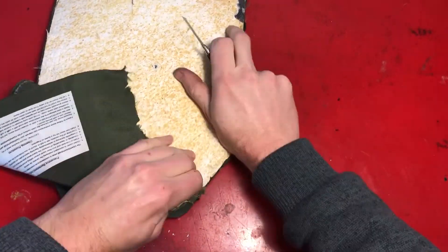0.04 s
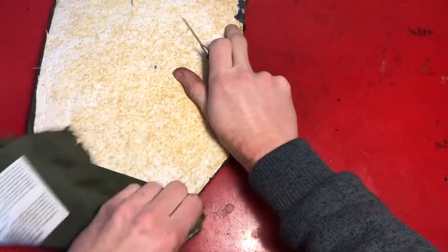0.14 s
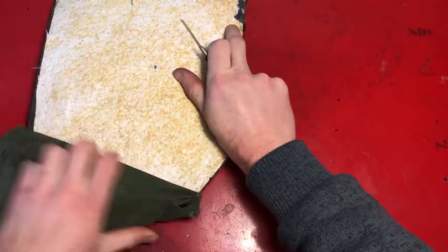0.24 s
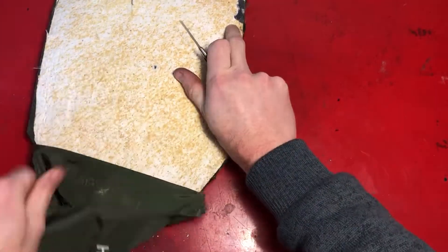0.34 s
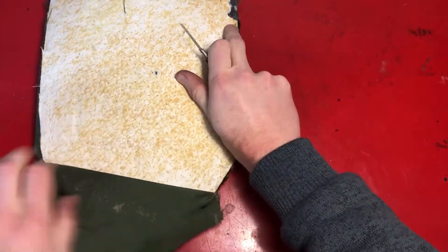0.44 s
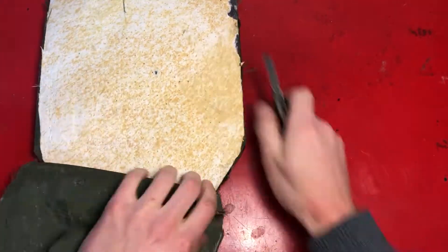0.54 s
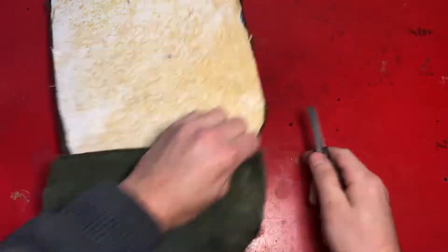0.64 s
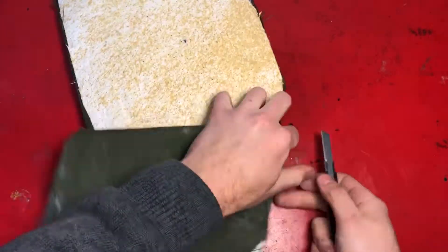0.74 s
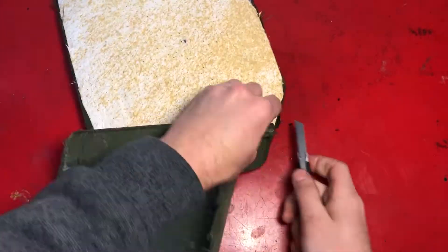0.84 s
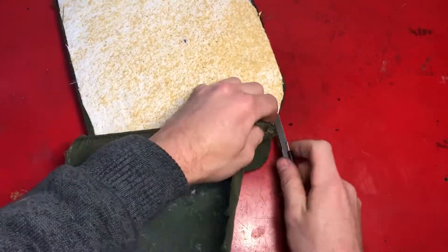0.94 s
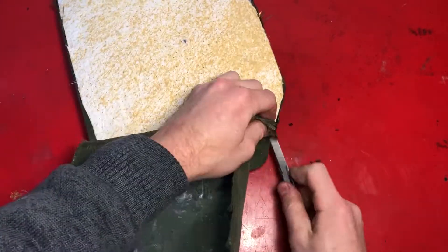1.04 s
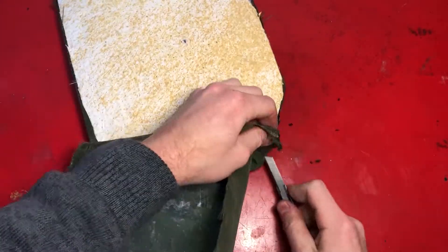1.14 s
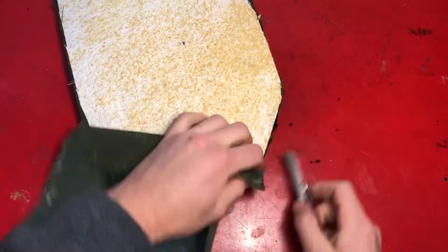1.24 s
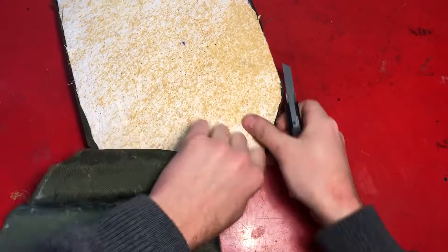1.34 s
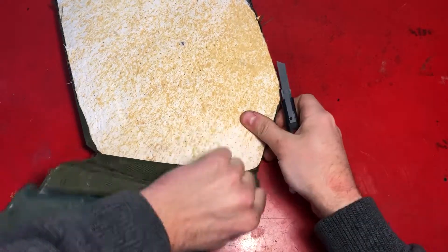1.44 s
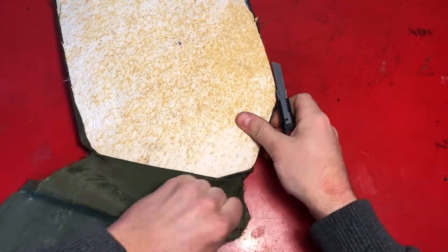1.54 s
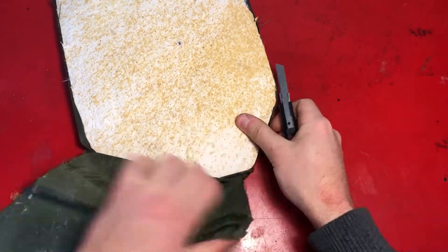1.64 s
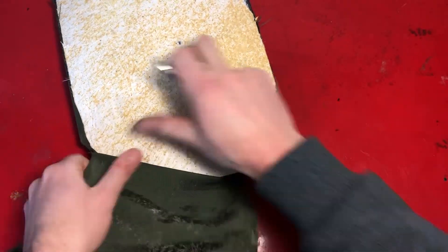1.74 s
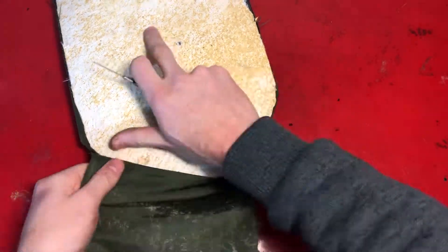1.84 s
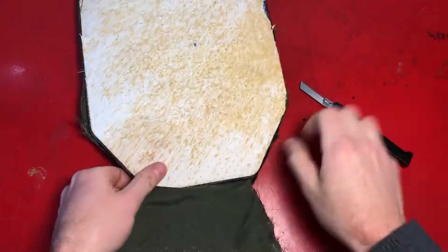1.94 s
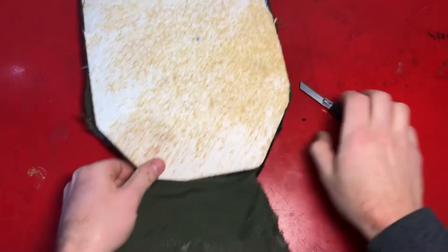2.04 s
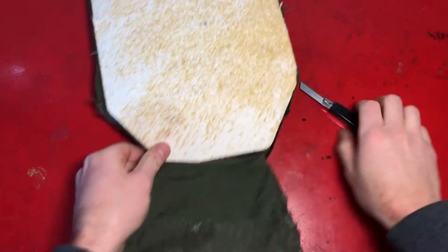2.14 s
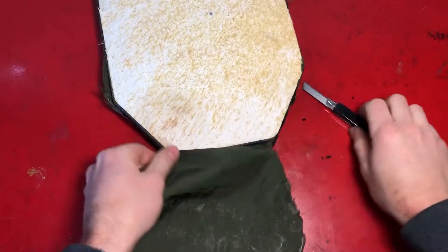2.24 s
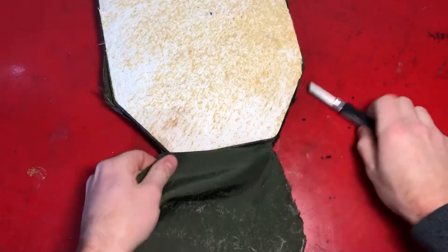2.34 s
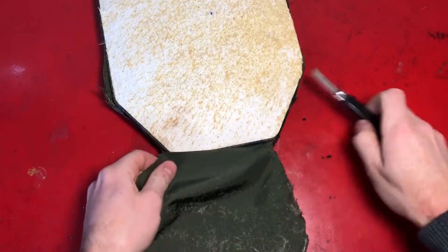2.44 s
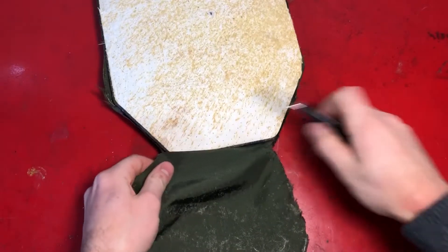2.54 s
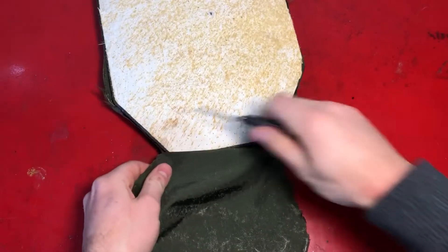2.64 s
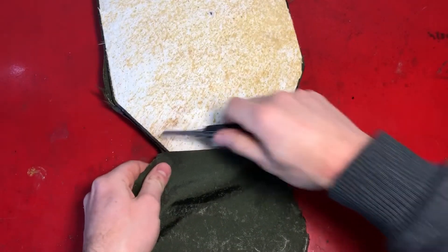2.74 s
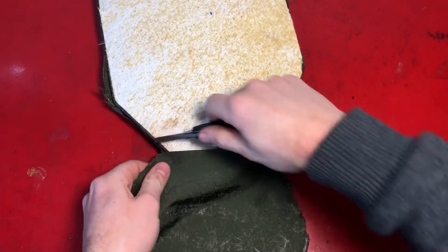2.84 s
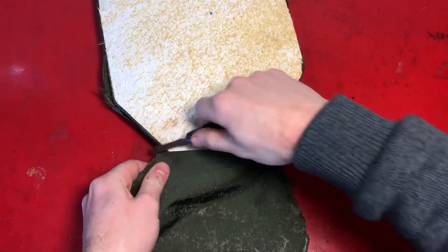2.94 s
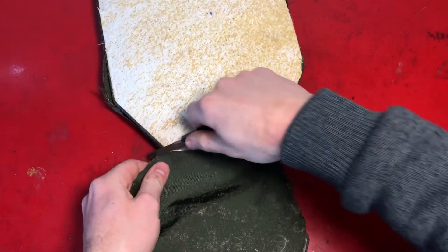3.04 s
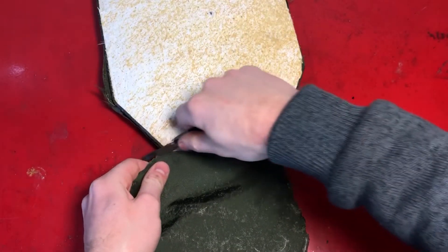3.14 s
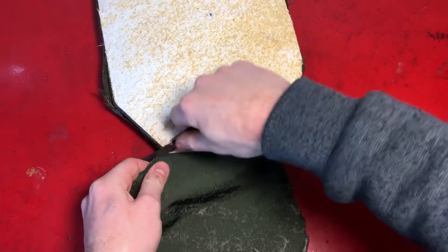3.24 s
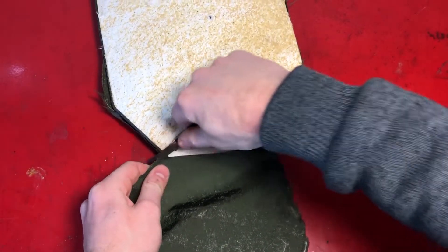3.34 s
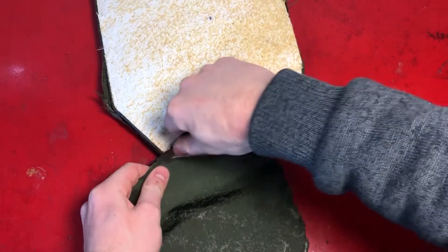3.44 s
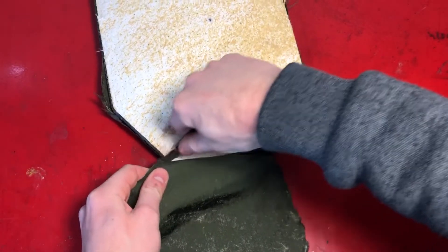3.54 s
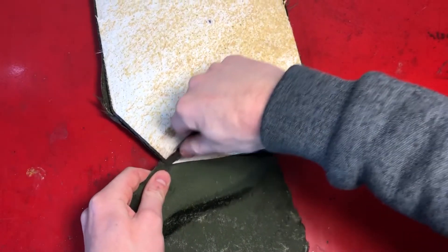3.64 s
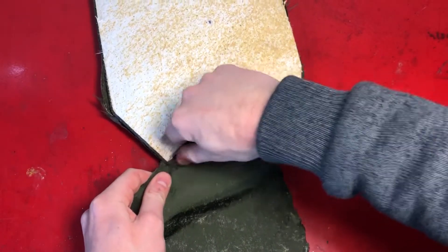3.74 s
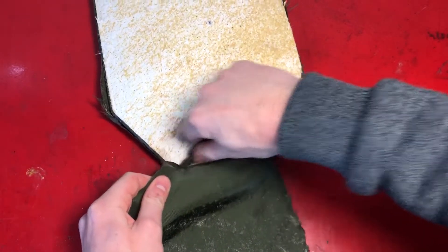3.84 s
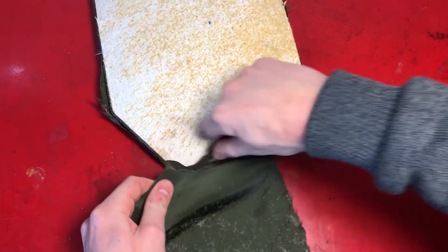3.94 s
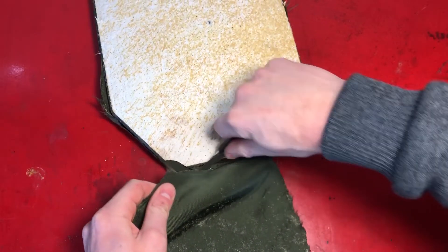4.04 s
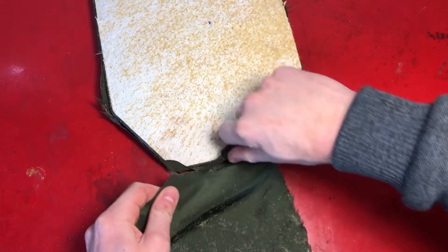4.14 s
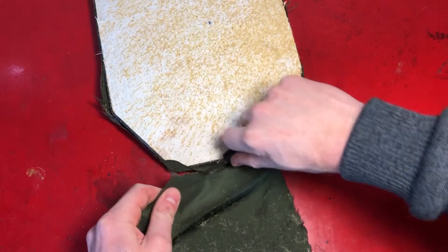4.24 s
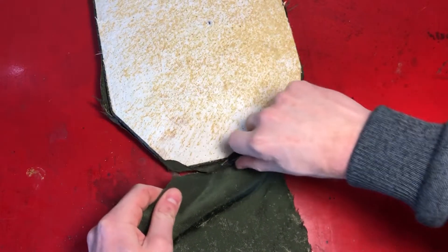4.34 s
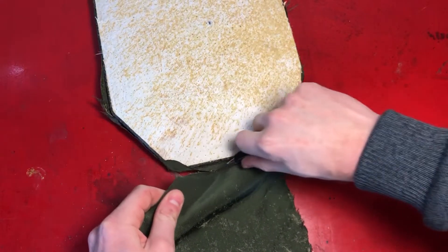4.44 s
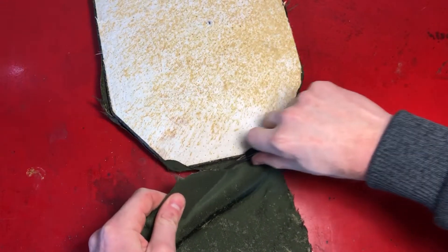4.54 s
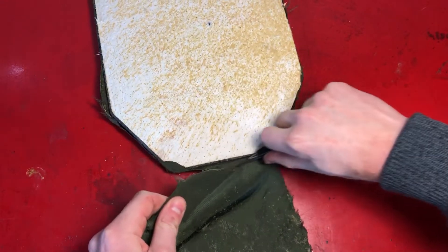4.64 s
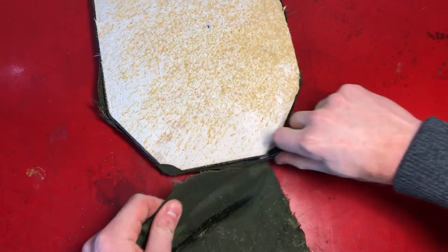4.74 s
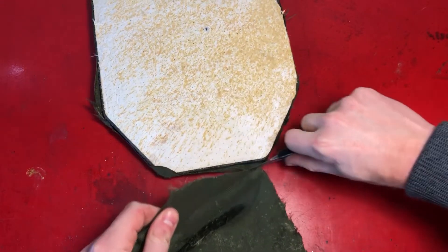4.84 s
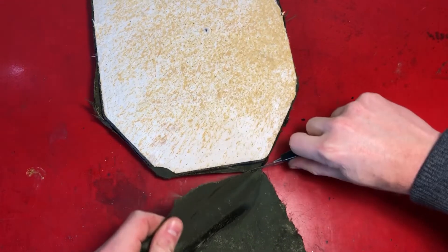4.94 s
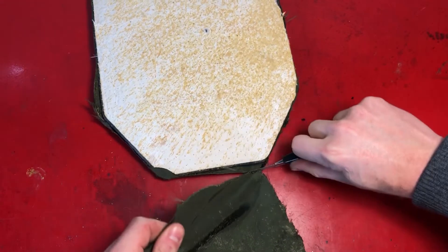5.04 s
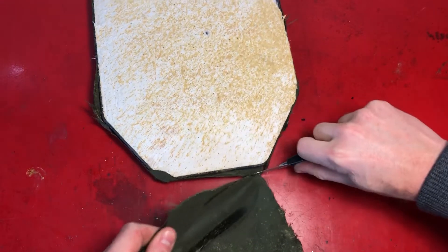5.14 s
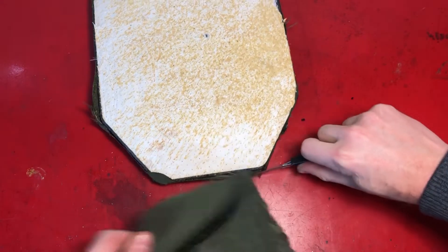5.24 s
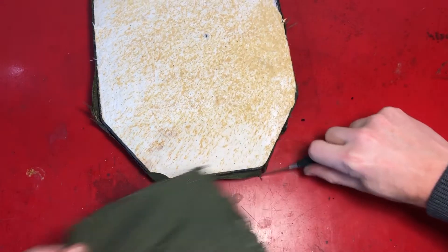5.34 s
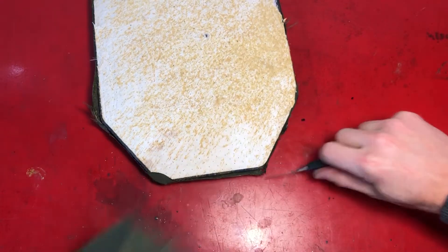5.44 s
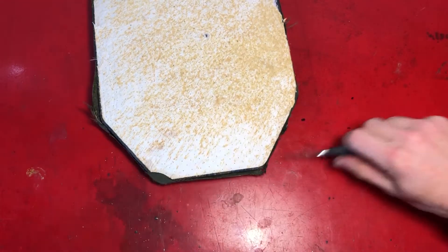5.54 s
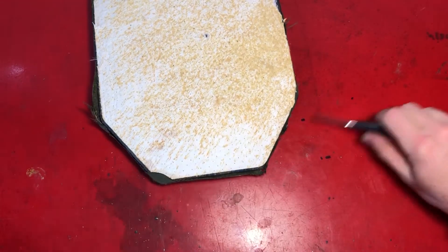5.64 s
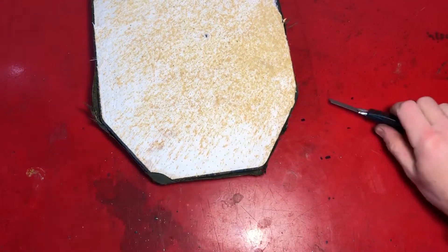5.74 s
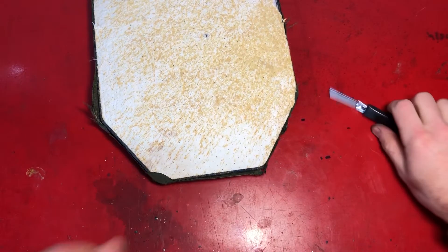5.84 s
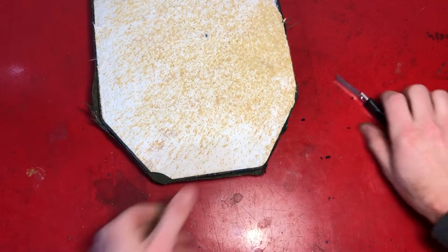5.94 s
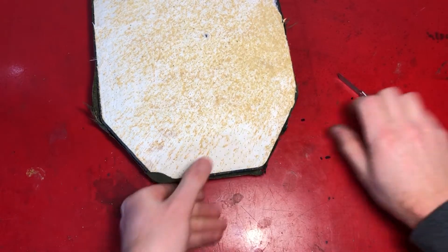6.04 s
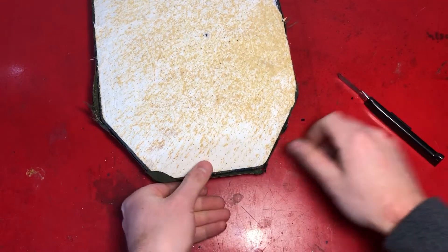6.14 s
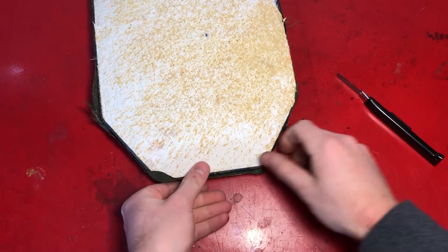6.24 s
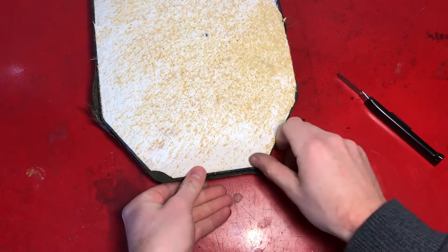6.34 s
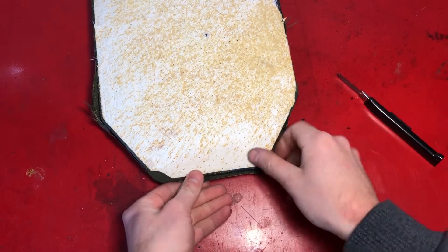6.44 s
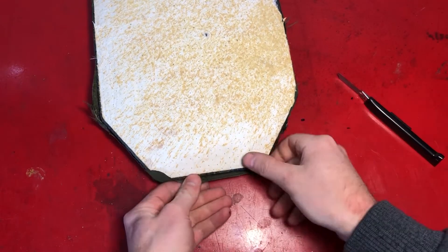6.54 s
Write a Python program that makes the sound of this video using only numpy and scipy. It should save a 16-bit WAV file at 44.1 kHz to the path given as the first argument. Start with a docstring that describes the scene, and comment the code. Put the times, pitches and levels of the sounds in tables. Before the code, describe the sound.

Close at a workbench, hands peel stiff glued cloth from a hard plate with light crackles, snaps and dull bumps. After a quieter stretch of faint rustling, a knife tears through in dense, bright, scratchy bursts, strongest past the middle. The ripping thins out, the knife is laid down with a hard clack, and faint handling follows. Small dry room, close microphone.

```python
"""At a workbench, hands peel a glued fabric cover off a hard plate and a knife cuts it free.
Glue and threads let go as dense crackle and click bursts that ring in cloth, loose flap and plate.
Noise through low resonances makes the bench boom under the pull; struck decaying modes and a rattle
lay the knife down with two taps and a clack. Coloured noise and a faint hum fill the room."""
import sys
import numpy as np
from scipy import signal
from scipy.fft import rfft, irfft
from scipy.io import wavfile
from scipy.ndimage import uniform_filter1d

SR = 44100
rng = np.random.default_rng(int(sys.argv[2]) if len(sys.argv) > 2 else 0)


def persist_wave(psi):
    """Save psi, clipped to +-1, as 16-bit WAV."""
    counts = np.round(np.clip(psi, -1, 1) * 32767).astype(np.int16)
    wavfile.write(sys.argv[1], SR, np.atleast_2d(counts).T)


N = 290619   # samples

AIR_DB, HUM_HZ, HUM_DB = -61, 120, -62
ROOM_T60_S, ROOM_DB, WALL_CUT_HZ = 0.1, -18.5, 3100
THREADS_PER_S, THREAD_UNEVEN_DB = 200, 4   # median rate, its spread
CLOTH_LOW_HZ, CLOTH_HIGH_HZ, CLOTH_DB = 2260, 6780, 2.5
FLAP_WIDTH_HZ, FLAP_DB = 850, -1
RIP_TAUT_DB, RIP_TREBLE_DB = -9.5, 0   # lifts shared by all rips
CUTOFF_HZ = 15850
CONTROL_STEP = 32   # samples per envelope point


def amp(db):
    """Gain of a level in dB."""
    return 10 ** (np.asarray(db) / 20)


def rms_one(x):
    """Scale to rms 1."""
    return x / np.sqrt(np.mean(x ** 2) + 1e-20)


def in_time(rows):
    """Interpolate each column of a (time, values...) table to every sample."""
    s, *columns = np.transpose(rows)
    return [np.interp(np.arange(N) / SR, s, c) for c in columns]


def drift(rate_hz):
    """Slow random wander of rms 1: white noise through a double real pole."""
    r = np.exp(-2 * np.pi * rate_hz / SR)
    noise = rng.standard_normal(N + 9000)
    return rms_one(signal.lfilter([1], [1, -2 * r, r * r], noise)[9000:])   # skip the start-up


def swell(s, db, rise_ms, hold_ms, fall_ms):
    """Envelopes, one per row: 9 dB up per rise time, a hold, 9 dB down per fall time."""
    ms = np.arange(0, N + CONTROL_STEP, CONTROL_STEP) * (1000 / SR) - 1000 * s[:, None]
    early = np.minimum(ms, 0) / np.maximum(rise_ms, 1)[:, None]
    late = np.maximum(ms - hold_ms[:, None], 0) / np.maximum(fall_ms, 1)[:, None]
    return amp(np.maximum(db[:, None] + 9 * (early - late), -200))


def fine(x):
    """Interpolate a control from envelope points to every sample."""
    return np.interp(np.arange(N) / CONTROL_STEP, np.arange(len(x)), x)


def resonate(x, peaks):
    """Parallel two-pole resonances, signs alternating; white noise of rms 1 comes out at rms 1."""
    def bank(v):
        out = 0
        for k, (hz, width_hz, db) in enumerate(peaks):
            r = np.exp(-np.pi * width_hz / SR)
            poles = [1, -2 * r * np.cos(2 * np.pi * hz / SR), r * r]
            out = out + (-1) ** k * amp(db) * signal.lfilter([1 - r * r, 0, r * r - 1], poles, v)
        return out
    impulse_response = bank(np.eye(1, SR // 4)[0])
    return bank(x + 1e-18) / np.sqrt(np.sum(impulse_response ** 2))


def air():
    """Steady room noise, shaped in the spectrum, and a mains hum of wavering level."""
    # room noise spectrum: f/Hz, density/dB (relative)
    air_colour = [(15, -44), (25, -9.5), (92, -6.5), (127, -6), (206, -11), (394, -14.5), (531, -22),
                  (796, -24.5), (887, -22.5), (2050, -20.5), (2700, -28.5), (6000, -34.5), (16000, -40)]
    colour_hz, colour_db = np.array(air_colour).T
    hz = np.fft.rfftfreq(N, 1 / SR) + 1   # +1 avoids log 0
    colour = np.interp(np.log(hz), np.log(colour_hz), colour_db)
    noise = irfft(rfft(rng.standard_normal(N)) * amp(colour), N)
    hum = amp(HUM_DB + 1.5 * drift(1.9)) * np.sin(2 * np.pi * HUM_HZ * np.arange(N) / SR)
    return amp(AIR_DB) * rms_one(noise) + hum


def bench():
    """Uneven pull and single jolts shake the low resonances of the bench top."""
    # bench shaken by the pull: t/s, boom level/dB, knock lift/dB
    shake = [(0.0, -35, -6), (0.24, -62, -2), (0.71, -60, -9), (0.92, -52, -7), (1.23, -62, 0),
             (1.91, -61, -3), (2.33, -53.5, -3.5), (2.62, -68, -3), (3.04, -68, 0), (3.89, -45, -6),
             (4.5, -55.5, -3), (4.77, -39.5, 0.5), (5.05, -45, -8), (5.32, -40, 2.5), (5.6, -59, -5),
             (5.89, -75, 9), (6.08, -60, -10), (6.59, -55.5, -0.5)]
    # rumble of handling under the boom, two stretches: t/s, level/dB
    rumble_curve = [
        [(0.0, -48), (0.258, -55.5), (1.164, -59.5), (1.698, -54.5), (1.9, -70)],
        [(1.92, -68), (3.19, -77.5), (3.35, -66), (6.25, -63), (6.59, -64)],
    ]
    # added jolts: t/s, boom level/dB, rise/ms per 9 dB, fall/ms per 9 dB, knock lift/dB, rumble lift/dB
    jolt_rows = [(.16, -38, 44, 29, -0.5, -12), (.415, -45.5, 19, 36, 3.5, -5),
                 (.55, -38, 12, 41, -12, -13), (.7, -38, 39, 27, -4, -8), (.79, -44, 12, 13, -1, -6),
                 (1.08, -49, 11, 40, -14, -21), (1.17, -42, 21, 45, -10, -18.5),
                 (1.27, -40, 44, 21, -11, -11), (1.382, -52.5, 17, 100, 2, -12),
                 (1.52, -37.5, 18, 15, -3, -17), (1.84, -33, 14, 25, -9, -6),
                 (2.2, -34, 22, 32, -21.5, -12), (2.39, -42.5, 20, 67, -25, -33),
                 (3.58, -58, 180, 88, -8, -13), (3.76, -56, 31, 43, -0.5, -12.5),
                 (4.001, -50.5, 86, 79, 2.5, -18), (4.419, -51.5, 11, 39, 6, -17.5),
                 (4.78, -44.5, 77, 56, -0.5, -28), (4.6, -44.5, 40, 94, -1, -32),
                 (4.93, -40, 50, 26, -8, -29.5), (5.289, -30, 14, 13, -11, -21.5),
                 (5.43, -40.5, 60, 23, -21, -14), (6.041, -32, 54, 41, -7.5, -19),
                 (6.29, -45, 120, 31, -6, -25)]
    # bench boom resonances: f/Hz, width/Hz, level/dB
    boom_modes = [(125.8, 27, -6.5), (141.6, 27.8, -0.5), (175.4, 15.7, 1), (213.6, 34, -5)]
    # bench knock resonances: f/Hz, width/Hz, level/dB
    knock_modes = [(278, 100, -1), (392.5, 49, 4), (466, 305, -6)]

    boom_db, lift_db = in_time(shake)
    (rumble_db,) = in_time(np.vstack(rumble_curve))
    s, db, rise_ms, fall_ms, knock_lift_db, rumble_lift_db = np.transpose(jolt_rows)
    jolts = swell(s, db, rise_ms, 0 * s, fall_ms)

    boom_gain = amp(boom_db) + fine(jolts.sum(axis=0))
    knock_gain = amp(boom_db + lift_db) + fine(amp(knock_lift_db) @ jolts)
    rumble_gain = amp(rumble_db) + fine(amp(rumble_lift_db) @ jolts)

    boom = rms_one(resonate(resonate(rng.standard_normal(N), boom_modes), boom_modes))
    knock = rms_one(resonate(rng.standard_normal(N) * amp(1.4 * drift(30)), knock_modes))
    rumble_band = signal.butter(2, [55, 115], "band", fs=SR, output="sos")
    rumble = rms_one(signal.sosfilt(rumble_band, rng.standard_normal(N)))
    return boom_gain * boom + knock_gain * knock + rumble_gain * rumble


def knife():
    """Each tap strikes the decaying modes of handle and bench and spits a short noise rattle."""
    # knife laid down: t/s, level/dB, handle lift/dB, bench lift/dB, rattle lift/dB
    tap_rows = [(5.837, -38.5, 0, -28, -1), (5.846, -48.5, 3, -22, -27), (5.853, -59, -6, -24, -22),
                (5.869, -28.5, -7, -41, -7.5), (5.883, -48, 11, -18, -28), (5.893, -61, -3, -24, -23),
                (5.905, -61, -3, -22, -27), (5.926, -8, -18, -17.5, -11), (5.986, -27.5, -13, -7.5, -36)]
    # ringing modes of the handle: f/Hz, level/dB, t60/s
    handle_modes = [(474, -11, 0.45), (1570, -9, 0.037), (1648, -5, 0.067), (2970, -6, 0.069),
                    (3350, -3, 0.11), (3500, -9, 0.045), (4005, -1.5, 0.046), (4240, -4, 0.05),
                    (5960, -12, 0.075), (6500, -8, 0.034), (8170, 2, 0.02)]
    # ringing modes of the bench: f/Hz, level/dB, t60/s
    bench_modes = [(151.7, -14, 0.93), (186.6, -7, 0.83), (391, -3.5, 0.2), (448, -4, .12),
                   (704, -8, 0.086), (570, -6.5, 0.089), (877, -4.5, 0.14), (970, 0, 0.1),
                   (1120, -2, 0.059), (1360, -14, 0.12), (1536, -5, 0.063), (2440, -20, 0.099)]

    s, tap_db, handle_db, bench_db, rattle_db = np.transpose(tap_rows)
    at = np.round(s * SR).astype(int)
    out = np.zeros(N)
    for modes, lift_db in ((handle_modes, handle_db), (bench_modes, bench_db)):
        for hz, db, t60_s in modes:
            strike_db = tap_db + lift_db + db + rng.normal(0, 3.8, len(at))
            clicks = np.full(N, 1e-18)
            clicks[at] = amp(strike_db) * rng.choice([-1, 1])
            r, w = amp(-60 / (t60_s * SR)), 2 * np.pi * hz / SR
            out += signal.lfilter([0, np.sin(w)], [1, -2 * r * np.cos(w), r * r], clicks)

    blows = np.zeros(N)
    blows[at] = amp(tap_db + rattle_db)
    rattle_t60_s = 0.13
    rattle = signal.lfilter([1], [1, -amp(-60 / (rattle_t60_s * SR))], blows) * rng.standard_normal(N)
    out += resonate(rattle, [(1180, 1400, 1.5), (4500, 6900, 0.69), (11000, 9300, -1.8)])
    # the taps carry no deep bass below about 130 Hz
    return signal.sosfilt(signal.butter(2, 130, "high", fs=SR, output="sos"), out)


def crackle(per_s, grain_db):
    """Fibres part at random in clumps, threads of the weave pop in near-regular turn; rms about 1."""
    sizes = amp(grain_db * np.minimum(rng.exponential(1, N), 5)) * rng.choice([-1, 1], N)
    grains = sizes * (rng.random(N) < per_s / SR) * amp(1.6 * drift(60))
    grains = grains / np.sqrt(uniform_filter1d(grains ** 2, SR // 20) + 1e-9)

    threads_per_sample = THREADS_PER_S / SR * amp(THREAD_UNEVEN_DB * drift(150))
    threads = np.diff(np.floor(np.cumsum(threads_per_sample)), prepend=0)
    pop_sizes = rng.uniform(0.16, 1.5, N) * rng.choice([-1, 1], N)
    pops = threads * pop_sizes * amp(5.1 * grain_db + 0.5)
    return (grains + pops) / np.sqrt(1 + uniform_filter1d(pops ** 2, SR // 10))


def strokes():
    """Crackle of the strokes, coarser the harder the pull, and their power-weighted mean colours."""
    # strokes of peeling, cutting and sliding: t/s, crackle level/dB, rise/ms per 9 dB, hold/ms,
    # fall/ms per 9 dB, plate lift/dB, taut-cloth lift/dB, treble lift/dB, low plate lift/dB, flap f/Hz
    stroke_rows = [(0.0, -51.5, 5, 15, 30, 5, 1, -4, -2, 3770),
                   (0.14, -38.5, 46, 10, 50, -22, -5, -2, -5.5, 3400),
                   (0.22, -48, 35, 250, 50, -1, -2, -5, -6, 3460),
                   (0.57, -48, 19, 330, 20, -3, -1.5, -6, -2, 3900),
                   (0.94, -58.5, 20, 100, 20, -4, 1, -11, -10, 4900),
                   (1.06, -38.5, 7.4, 60, 30, -16, -18, -9, 1, 4400),
                   (1.15, -37, 44, 70, 40, -12.5, -6, -5, -7, 5240),
                   (1.345, -49.5, 77, 10, 90, -2.5, -6, -4, -5.5, 4000),
                   (1.5, -41.5, 84, 5, 20, -2, -5, -2.5, -7, 3940),
                   (1.57, -51, 37, 100, 30, -2, -3, -6.5, -6, 4040),
                   (1.75, -47.5, 46, 20, 60, -11, -10, -8.5, -2, 4260),
                   (1.82, -53, 58, 80, 5, 1, 2, -3, -8, 3570),
                   (2.16, -48, 79, 140, 80, 0, -4.5, -5, -9.5, 3860),
                   (2.45, -48.5, 34, 30, 70, 3, -5, -6.5, -11, 4100),
                   (2.54, -56, 24, 120, 30, 1, -6, -8, -11, 4000),
                   (2.727, -57.5, 62, 10, 120, 2, -6, -10, -6.5, 3950),
                   (3.047, -49, 7.1, 190, 60, 0.5, -9, -13, -16, 3040),
                   (3.36, -41, 61, 5, 10, -1, -18, -8, -7, 4840),
                   (3.405, -47, 6.3, 55, 40, 3, 1, -4.5, -12.5, 3330),
                   (3.6, -34, 25, 5, 27, -2, -2, -5.5, -19, 4460),
                   (3.7, -44, 17, 75, 25, -1, -10, -5, -17, 4640),
                   (3.832, -21.5, 3.5, 6.9, 55, -0.5, -7.5, -5, -12, 5030),
                   (3.89, -25.5, 34, 180, 18, -8.5, -1.5, -9, -8, 4170),
                   (4.1, -41.5, 3.33, 5, 90, -2.5, -12, -7, -15.5, 4240),
                   (4.24, -57, 60, 135, 20, 9, -1.5, -11, -28.5, 4400),
                   (4.4, -18, 2.8, 3, 10, -5.5, -28, -10.5, -20, 3900),
                   (4.45, -36.5, 19, 40, 30, 0, -1.5, -15, -13.5, 3700),
                   (4.55, -22, 63, 200, 60, -6.5, -10.5, -6, -18, 3940),
                   (4.76, -27, 10, 85, 40, -12, -8, -6, -2.5, 3900),
                   (4.88, -34, 11, 50, 22, -13, -9, -7.5, -18.5, 4030),
                   (5.13, -43.5, 74, 60, 40, -10, -5, -9, 0, 4600),
                   (5.26, -34, 92, 25, 12, -1, -4, -3.5, -30.5, 4070),
                   (5.31, -53, 10, 170, 8, -16, -5, -12, -7, 4800),
                   (5.556, -66, 8, 5, 25, -9, -7, -6, -5, 3980),
                   (5.61, -56.5, 6, 51, 13, -2.5, -1, -7.5, -3, 3280),
                   (5.99, -48.5, 33, 5, 60, 10, 5, -10, -4, 3960),
                   (6.05, -56, 19, 10, 32, -16, -10, 9, -3, 4000),
                   (6.07, -56, 30, 160, 45, -2, -4, -8, -4, 3440),
                   (6.235, -54.5, 25, 5, 22, 0, -1, -7, 4, 3600),
                   (6.336, -60, 33, 5, 60, -13, -10, -6, -5, 3740),
                   (6.482, -53, 31, 5, 18, -6, -5, -2.5, -8, 4400),
                   (6.55, -60, 40, 50, 20, -1.5, -5, -1.5, 5, 4150)]
    s, db, rise_ms, hold_ms, fall_ms, *colours = np.transpose(stroke_rows)
    power = swell(s, db, rise_ms, hold_ms, fall_ms) ** 2
    total = power.sum(axis=0)
    crackle_db = fine(10 * np.log10(total))
    grain_db = np.clip(4.5 + 0.059 * (crackle_db + 21.5), 0, 6)
    force = amp(crackle_db) * crackle(9000, grain_db)
    return force, [fine(c @ power / total) for c in colours]


def rips():
    """Uneven sprays of clicks swell to a peak and die away; short ones are single snaps."""
    # glue and threads ripping: t/s, crackle level/dB, plate lift/dB, rise/ms per 9 dB, fall/ms per 9 dB
    rip_rows = [(0.048, -43, 0.5, 2, 36), (.0913, -33, -5, 2.5, 3.4), (0.119, -24.5, 0, 1.7, 7.7),
                (0.1618, -22, 5, 7.4, 5.9), (.1909, -40.5, 10.5, 3.5, 3.1), (0.2323, -47.5, 11, 6, 6),
                (0.2647, -41, 6, 9.8, 10), (.3046, -39, 10, 0.23, 2.2), (.381, -35.5, 1.5, 5.4, 30),
                (0.484, -38.5, -6.5, 1.2, 15), (0.5525, -34, -4.5, 5.4, 9.8), (.583, -39, -3.5, 5.6, 13),
                (.625, -37, 0.5, 6.7, 21), (.715, -37.5, -10, 3.9, 9), (.7855, -36, 1.5, 2.7, 7.9),
                (0.8069, -45, -9, 2.4, 11), (0.8809, -40.5, -7, 10, 23), (1.0077, -48, 5, 5.2, 2.1),
                (1.051, -24.5, -10.5, 0.34, 1.9), (1.0715, -23.5, -16.5, 5.3, 8.5),
                (1.1193, -36, -22, .37, 6.6), (1.1366, -21.5, -8.5, .37, 3.7), (1.1565, -30, -10, 23, 1.8),
                (1.1689, -22.5, -12.5, 4.4, 2.6), (1.2003, -28, -8.5, 2.1, 5), (1.2548, -26, -13, 1.6, 4.1),
                (1.3026, -35.5, -10, 9.4, 17), (1.3547, -36, 0, 0.22, 15), (1.393, -42, 3, 8.1, 32),
                (1.4444, -28.5, -0.5, 0.39, 1.4), (1.4812, -27.5, -15, .3, 2.3),
                (1.506, -14.5, -4, 1.4, 4.7), (1.521, -28, -17.5, 14, 2.5), (1.621, -34.5, -37, 0.33, 3),
                (1.6523, -37.5, 5, 0.19, 2.7), (1.6797, -37, -6, 1, 17), (1.73, -43, -10, 6.8, 11),
                (1.7769, -39, 3.5, 9.2, 9.5), (1.836, -41, 3, 3.4, 4.7), (1.9045, -45, 1, 9.5, 2.1),
                (2.86, -58.5, -3.5, .2, 2.1), (3.235, -16.5, -6.5, 0.19, 3.5), (3.3019, -33.5, -5, 2, 7.3),
                (3.324, -28.5, -8, 1.3, 2.4), (3.3447, -43, -14, 2.3, 4.7), (3.3544, -32.5, -22, 14, 14.3),
                (3.4126, -26.5, 4, .2, 1.8), (3.43, -23.5, -3, 0.53, 3.5), (3.445, -27, -12, 1.8, 4.6),
                (3.473, -28, 1, .22, 9.6), (3.5434, -32, 2, 1.5, 7.1), (3.5651, -21, 1, .2, 6.8),
                (3.5829, -22, -2, 1.7, 1.8), (3.595, -26, 1, 2.4, 3.8), (3.6044, -26, 0, .2, 1.4),
                (3.617, -27, -6, 1.1, 1.2), (3.6331, -19.5, -3.5, 2, 3.9), (3.687, -29, 2.5, 5.9, 1.1),
                (3.7076, -23.5, 2.5, 3, 2.5), (3.7191, -27.5, 10, 0.19, 1.9), (3.7304, -20, 3, 1.5, 1.1),
                (3.7527, -19, 0, 0.37, 6.8), (3.76, -22, 4.5, 10.3, 2), (3.8265, -28.5, 3.5, 0.35, 6.1),
                (3.865, -16, -4, 11.7, 9.6), (3.943, -17, -6.5, 14, 2.3), (3.962, -18.5, -7, 5.6, 1.3),
                (3.975, -15, -11, 0.98, 3.5), (3.9931, -15.5, -9.5, .7, 20), (4.0143, -17, -2.5, 1.8, 17),
                (4.0575, -14, -3, 9.6, 2.6), (4.0637, -11.5, -12, 0.16, 2.2),
                (4.0876, -18.5, -11, .23, 2.5), (4.1284, -18.5, -6, 0.49, 2.7),
                (4.1405, -20, 0.5, 3.8, 3.2), (4.207, -34.5, 4.5, .2, 2.8), (4.223, -14, -1.5, 0.19, 2.4),
                (4.3024, -22.5, 4, 0.84, 2.5), (4.3784, -36.5, -6, .2, 0.87),
                (4.3879, -12.5, 0.5, 0.21, 2.7), (4.3914, -12.5, -6, 0.61, 8.6),
                (4.4393, -19, -4, .48, 1.8), (4.4572, -15.5, -2.5, 3.9, 10.5), (4.473, -17, -7, 7.3, 2.1),
                (4.4903, -19.5, -10.5, .2, 7.1), (4.511, -12.5, -3, 0.26, 3.3),
                (4.5319, -9.5, -4.5, .3, 1.4), (4.5372, -17.5, -6, 1.5, 5.1), (4.549, -18.5, -2, 0.46, 8.6),
                (4.5671, -17.5, -5, 2.2, 13), (4.5933, -14.5, 2, 0.24, 1), (4.6101, -14.5, -4, .2, 1.5),
                (4.614, -17.5, -2, .2, 2.6), (4.626, -16, -10, .2, 1.3), (4.6397, -19.5, -1.5, .2, 1.3),
                (4.7065, -29, -9, .2, 1.3), (4.882, -25, -12, 3.8, 4), (4.923, -23, -11.5, 0.25, 2.5),
                (4.9383, -29.5, -11.5, 8.5, 6.2), (4.971, -40.5, -12, .4, 2.8),
                (5.0013, -44.5, -22.5, .2, 2.1), (5.023, -41.5, -16, .2, 3.3),
                (5.0401, -36.5, -24, .2, 4.6), (5.0616, -24.5, -12, 0.32, 2.4),
                (5.07, -26, -8.5, 0.16, 2.4), (5.093, -32, -13, .2, 1.8), (5.107, -28, -13, .2, 2.2),
                (5.1172, -26, -7.5, 0.17, 12), (5.1422, -26, -13.5, 1.6, 5.1), (5.16, -20.5, -11, 0.32, 4),
                (5.1785, -24.5, -8, .22, 10), (5.2224, -30, -6, 6, 8.2), (5.2528, -17.5, -4, 0.18, 1.3),
                (5.2664, -19, -6.5, 0.96, 5.2), (5.279, -27.5, 3, 3.3, 5.8), (5.313, -32.5, -5, 0.22, 5.6),
                (5.4, -43.5, -2.5, 12, 14), (5.437, -39, -1, .18, 2.4), (5.468, -43, -21.5, 2.2, 7.6)]
    half = SR // 10
    ms = 1000 * np.arange(-half, half) / SR
    force = np.zeros((2, N + 2 * half))   # rows: cloth, plate
    spray = rng.standard_normal((len(rip_rows), 2 * half))
    spray = spray * np.abs(spray) ** 1.42 * 0.47
    spray[:, half] = 7.0   # a strong thread parts at the peak
    for (s, db, plate_db, rise_ms, fall_ms), burst in zip(rip_rows, spray):
        at = round(s * SR)
        swell_db = 9 * np.where(ms < 0, ms / max(rise_ms, .1), -ms / max(fall_ms, .5))
        lift_db = np.array([[0], [plate_db]])
        force[:, at:at + 2 * half] += amp(db + lift_db + swell_db) * burst
    return force[:, half:half + N]


def flap(x, hz):
    """A resonance of peak gain about 1 whose centre moves, stepped in short blocks."""
    out, state = np.zeros(N), np.zeros(2)
    r = np.exp(-np.pi * FLAP_WIDTH_HZ / SR)
    gain = (1 - r * r) / 2
    block = 256   # samples
    for i in range(0, N, block):
        poles = [1, -2 * r * np.cos(2 * np.pi * hz[i] / SR), r * r]
        out[i:i + block], state = signal.lfilter([gain, 0, -gain], poles, x[i:i + block], zi=state)
    return out


def tearing():
    """Strokes and rips drive cloth and plate; the loose flap rings with the cloth's sound."""
    # plate resonances: f/Hz, width/Hz, level/dB
    plate_modes = [(833, 95, -9.5), (1122, 79, 1.5), (1249, 62, 4.5), (1451, 130, 2), (1806, 60, -1.5),
                   (1892, 37, -5), (2210, 60, -12), (2650, 77, -6.5), (3158, 100, -7.5), (3237, 58, -6),
                   (3566, 110, -13.5), (4144, 57, -12), (4630, 34, -25), (5295, 90, -10.5),
                   (5420, 66, -8.5), (6090, 64, -14)]
    # low plate resonances: f/Hz, width/Hz, level/dB
    plate_low_modes = [(620, 132, 1), (758, 150, 4.5), (849, 92, 7.5)]
    # taut-cloth resonances: f/Hz, width/Hz, level/dB
    taut_modes = [(2074, 350, 6.5), (2570, 540, 6)]
    # one broad treble resonance: f/Hz, width/Hz, level/dB
    treble_mode = (11500, 13000, 0)

    stroke, (plate_db, taut_db, treble_db, low_db, flap_hz) = strokes()
    rip, rip_plate = rips()
    plate = amp(plate_db) * stroke + rip_plate
    treble = amp(treble_db) * (stroke + amp(RIP_TREBLE_DB) * rip)
    taut = amp(taut_db) * stroke + amp(RIP_TAUT_DB) * rip
    taut = taut * rng.choice([-1, 1], N)   # random signs, so taut cloth and sheet do not cancel

    # the cloth radiates a smooth broad band; the flap lifts a part of it
    cloth_band = signal.butter(2, [CLOTH_LOW_HZ, CLOTH_HIGH_HZ], "band", fs=SR, output="sos")
    sheet = signal.sosfilt(cloth_band, stroke + rip + 1e-18)
    fabric = amp(CLOTH_DB) * (sheet + amp(FLAP_DB) * flap(sheet, flap_hz))
    board = resonate(plate, plate_modes) + amp(low_db) * resonate(plate, plate_low_modes)
    return fabric - resonate(treble, [treble_mode]) + resonate(taut, taut_modes) + board


def room(x):
    """A diffuse tail: dull noise dying over the reverberation time."""
    t = np.arange(SR // 2) / SR
    tail = rng.standard_normal(len(t)) * amp(-60 * t / ROOM_T60_S) * (t > .003)
    tail = signal.lfilter(*signal.butter(1, WALL_CUT_HZ, fs=SR), tail)
    return signal.fftconvolve(x, tail / np.sqrt(np.sum(tail ** 2)))[:N]


def scene():
    """Tearing and knife with their room tail, over bench and room noise."""
    near = tearing() + knife()
    return (near + amp(ROOM_DB) * room(near) + bench() + air())[None]


def record(dry):
    """A brief level dip, rounded peaks, and a steep cut at the top."""
    # brief dip of the whole level: t/s, gain/dB
    dip_curve = [(1.904, 0), (1.908, -22), (1.919, -25), (1.922, 0)]
    (dip_db,) = in_time(dip_curve)
    rounded = np.tanh(dry * amp(dip_db) / 1.5) * 1.5
    return signal.sosfilt(signal.ellip(12, .5, 90, CUTOFF_HZ, fs=SR, output="sos"), rounded)


dry = scene()
out = record(dry)
persist_wave(out)
```